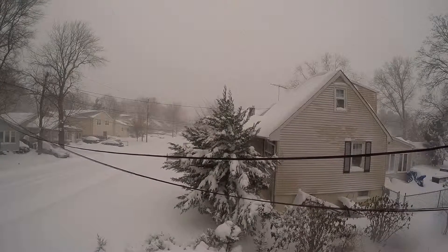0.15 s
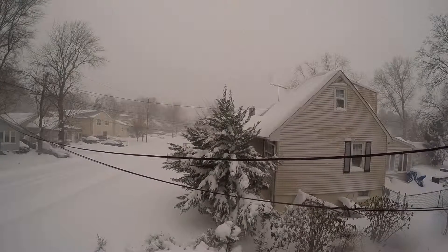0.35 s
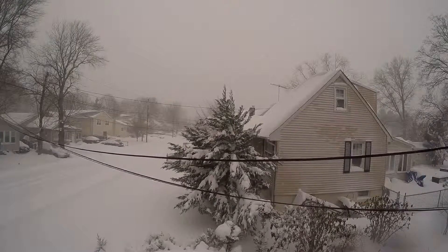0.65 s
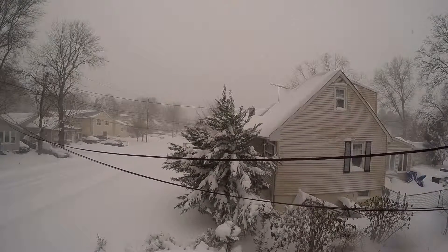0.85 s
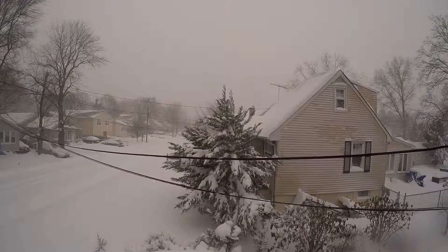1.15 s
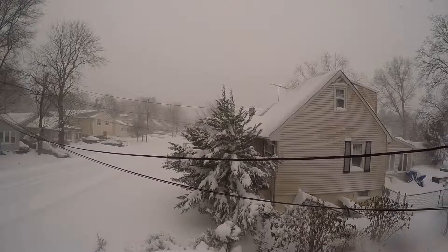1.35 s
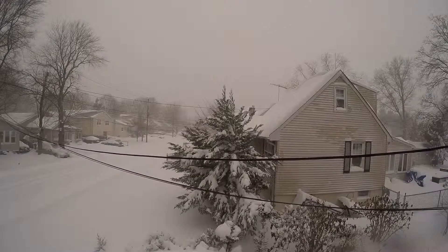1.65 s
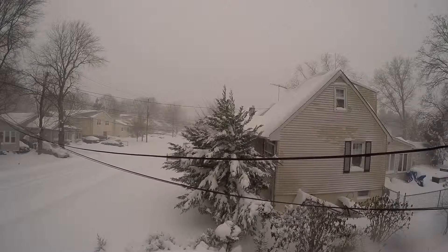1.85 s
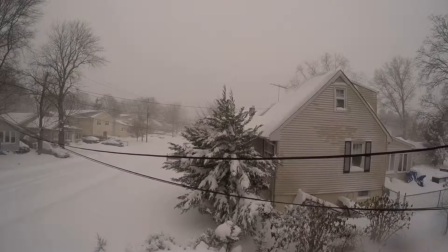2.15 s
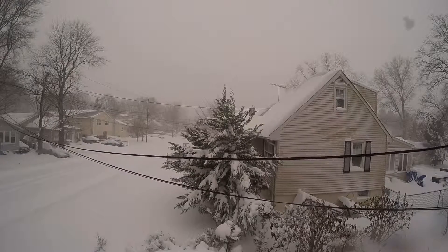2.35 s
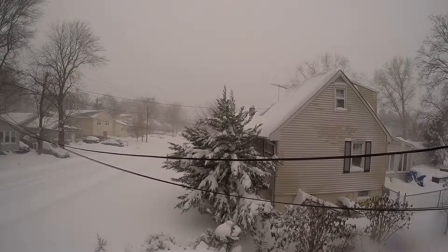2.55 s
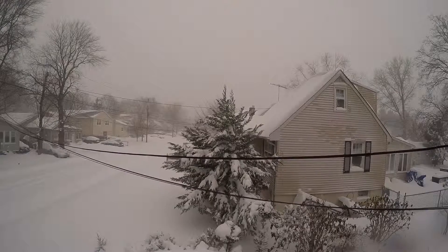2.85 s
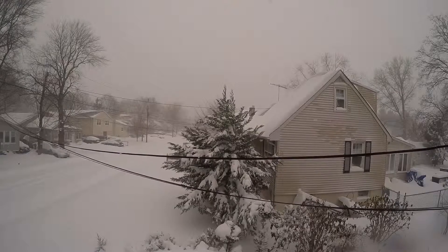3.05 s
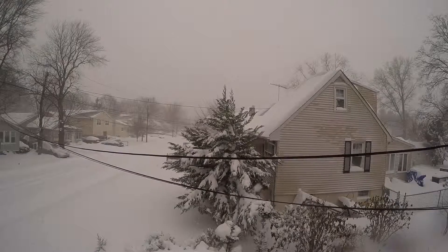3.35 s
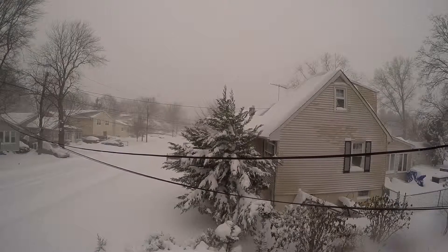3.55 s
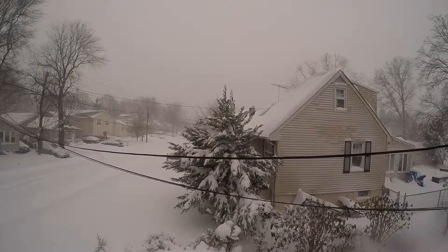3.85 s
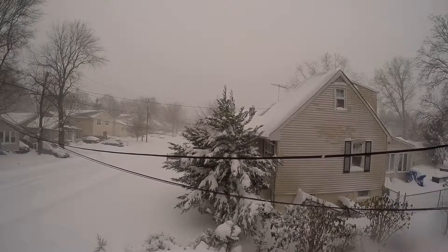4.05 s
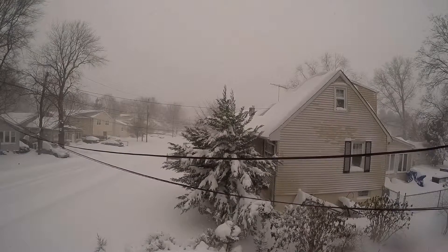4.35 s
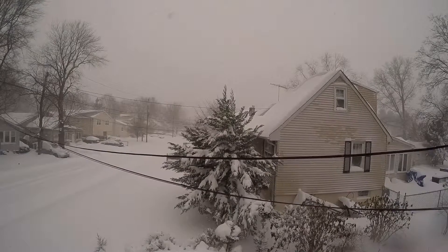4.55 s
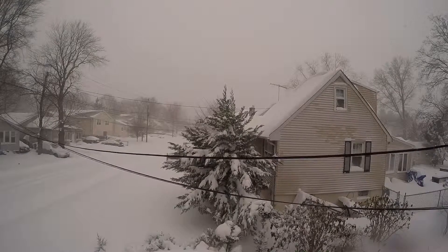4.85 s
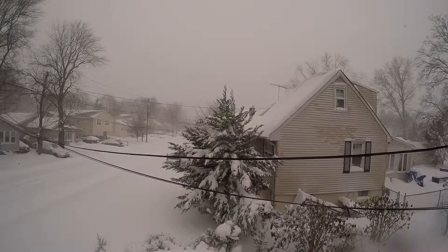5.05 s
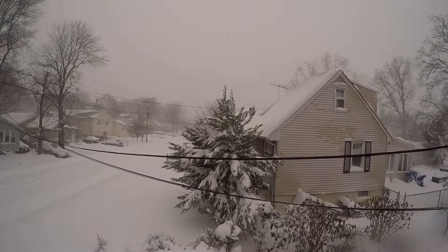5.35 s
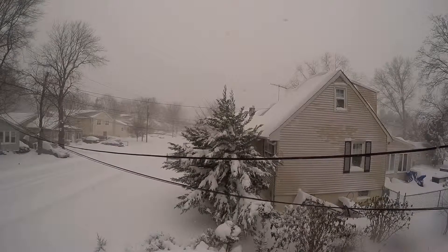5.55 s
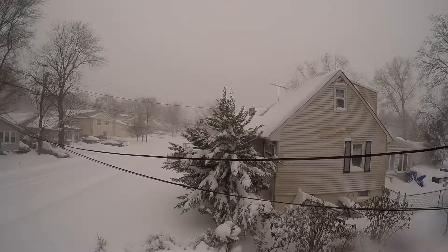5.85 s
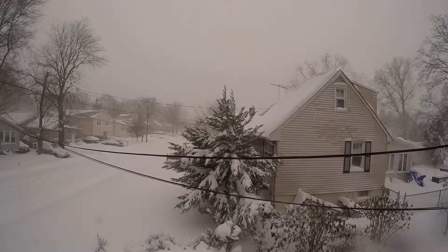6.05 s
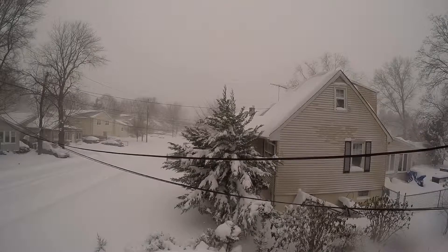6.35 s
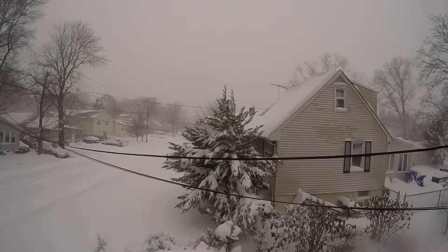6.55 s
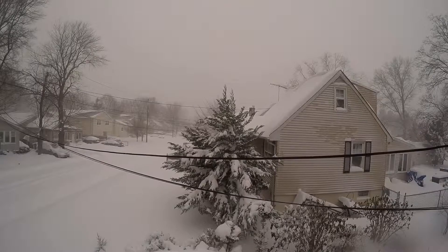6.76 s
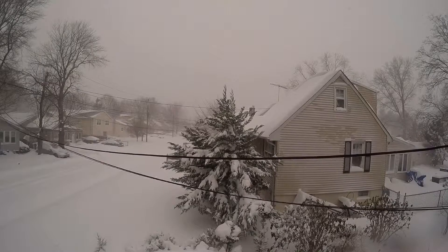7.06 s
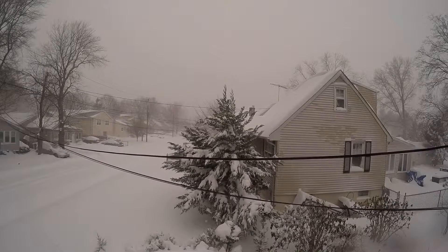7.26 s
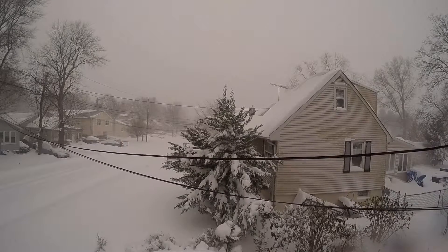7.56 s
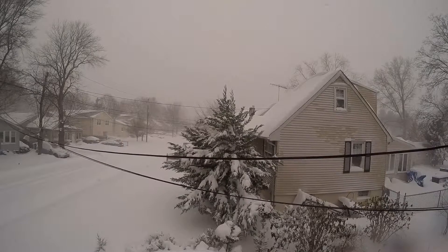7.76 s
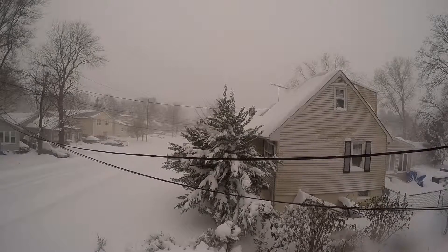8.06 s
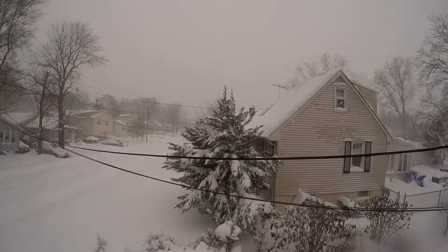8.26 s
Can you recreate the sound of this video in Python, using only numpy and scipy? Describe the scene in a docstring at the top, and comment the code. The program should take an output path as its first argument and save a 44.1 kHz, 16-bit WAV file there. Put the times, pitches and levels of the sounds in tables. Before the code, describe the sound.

Gusting snowstorm wind rumbles low against a microphone housing while driven snow crackles densely and ice pellets tick sharply over a faint distant hiss.

```python
"""Outdoors in a snowstorm: a microphone in a housing stands in the wind and the driven snow.
Far off the storm hisses, with a thin whine; at the port, eddies make low noise that swells with the wind.
Soft clumps tap as decaying sines. Fine grains excite the shell's resonances as a dense crackle over a
dull powder hiss. Bigger pellets tick sharply: short noise bursts sound the shell and crack above it."""
import sys
import numpy as np
from scipy import signal
from scipy.fft import rfft, irfft
from scipy.io import wavfile
from scipy.ndimage import uniform_filter1d

SR = 44100
rng = np.random.default_rng(int(sys.argv[2]) if len(sys.argv) > 2 else 0)


def to_wav(s):
    """Save 16-bit WAV."""
    ch = np.atleast_2d(s).T  # columns
    pcm = np.round(np.clip(ch, -1, 1) * 32767)  # PCM
    wavfile.write(sys.argv[1], SR, pcm.astype(np.int16))


N = 371322

# resonances of the housing: centre_hz, width_hz, gain_db
RESONANCES = [(770, 210, -11.5), (1045, 50, -10), (1316, 90, -6), (1802, 460, 0.5), (2147, 126, -2.5),
              (2353, 50, 2.5), (2713, 260, 6.5), (2970, 1900, -0.5), (4370, 840, 3.5), (6940, 2100, -4),
              (9480, 630, -2), (14400, 15000, -5.5)]
SNOW_DB = -50.5  # nominal level of fine snow in the usual wind, between flurries
CUTOFF_HZ = 15500  # upper limit of the microphone's band


def from_db(db):
    """Logarithmic level: an amplitude ratio is 10 to the power of dB / 20."""
    return 10 ** (np.asarray(db) / 20)


def rms_one(x):
    """Normalisation of power: each row is scaled to unit rms."""
    return x / np.sqrt(np.mean(x ** 2, axis=-1, keepdims=True) + 1e-20)


def butter(x, hz, kind, order=2):
    """Causal Butterworth filtering: the passband is maximally flat."""
    sections = signal.butter(order, hz, kind, fs=SR, output="sos")
    return signal.sosfilt(sections, x + 1e-18)


def noise(spectrum):
    """Spectral shaping: white noise is weighted by a relative spectrum, then set to rms 1."""
    hz, db = np.transpose(spectrum)
    bins = np.maximum(np.arange(N // 2 + 1) * SR / N, 1)
    gain = from_db(np.interp(np.log(bins), np.log(hz), db))
    # beyond the first and last points the amplitude falls 6 dB per octave
    gain = gain * np.minimum(bins / hz[0], 1) * np.minimum(hz[-1] / bins, 1)
    return rms_one(irfft(rfft(rng.standard_normal(N)) * gain, N))


def drift(per_s):
    """Random modulation: lines join independent normal values, per_s of them a second; rms 1."""
    at = np.arange(N) * per_s / SR
    return rms_one(np.interp(at, np.arange(N // 10), rng.standard_normal(N // 10)))


def evened(x, span_s):
    """Envelope normalisation: the short-time rms is held near 1, faster detail survives."""
    size = max(int(span_s * SR), 2)
    power = uniform_filter1d(uniform_filter1d(x ** 2, size), size)
    return x / np.sqrt(power + 1e-14)


def swell(s, length_s):
    """Gaussian envelope: 1 at its middle s, about a third half a length away."""
    return np.exp(-(2 * (np.arange(N) / SR - s) / length_s) ** 2)


def resonance(x, hz, width):
    """Damped oscillator: a two-pole resonance with gain 1 at its peak, its width set by the damping."""
    r = np.exp(-np.pi * width / SR)
    zeros = np.array([1, 0, -1]) * (1 - r * r) / 2
    poles = [1, -2 * r * np.cos(2 * np.pi * hz / SR), r * r]
    return signal.lfilter(zeros, poles, x + 1e-18)


def spots(count):
    """Modal coupling: each struck spot has a gain per resonance, with equal mean power over the spots."""
    gains = from_db(4.5 * rng.standard_normal((count, len(RESONANCES))))
    return gains / np.sqrt(np.mean(gains ** 2, axis=0))


def housing(force, spot):
    """Modal superposition: the force drives every shell resonance, weighted by the spot struck."""
    rings = 0
    for (hz, width, db), share in zip(RESONANCES, spot):
        rings = rings + from_db(db) * share * resonance(force, hz, width)
    return butter(rings, 530, "high")


def wind_level():
    """Interpolation between gust levels: wind strength in dB over its usual value."""
    # wind at the microphone: time_s, level_db (over the usual strength)
    gust_points = [(0, 0), (.3, 2.5), (.48, -1.5), (1.0, -2), (1.41, -.5), (1.5, -6), (2.05, -2.5),
                   (2.75, -2.5), (3.2, -6.5), (4.1, -5.5), (4.27, 2.5), (4.7, 0), (5.83, 2), (5.97, -3.5),
                   (6.55, -2.5), (7.38, 1), (7.63, -3), (7.85, 3), (8.07, 1.5), (8.42, 7.5)]
    s, db = np.transpose(gust_points)
    return np.interp(np.arange(N) / SR, s, db)


def far_storm():
    """Broadband turbulence noise: wind hisses in distant trees under a narrow-band whine."""
    # spectrum of the far hiss: frequency_hz, relative_db (per Hz)
    hiss_spectrum = [(100, 8), (250, 4), (350, 0.5), (520, -2.5), (660, -2.5), (900, -6), (1700, -3.5),
                     (2700, -7), (3600, -9), (4600, -11), (6000, -11), (10000, -21), (15000, -18.5)]
    hiss_db, whine_db = -54.5, -67.5  # mean hiss level, rms of the whine
    hiss = from_db(hiss_db + 0.6 * drift(1.65)) * noise(hiss_spectrum)
    whine = resonance(rng.standard_normal(N), 8540, 230)
    whine = rms_one(resonance(whine, 8540, 230))
    return hiss + from_db(whine_db) * whine


def buffeting():
    """Turbulent pressure at the port: big eddies heave, middling ones rumble, small ones flutter."""
    # spectra of the slow, middling and quick eddies, each: frequency_hz, relative_db (per Hz)
    heave_spectrum = [(10, -17.5), (20, -6.5), (33, -6), (42, -12), (55, -36), (120, -46)]
    rumble_spectrum = [(30, -40), (44, -5.5), (56, 0.5), (68, -5.5), (84, -12.5), (100, -19), (200, -52)]
    flutter_spectrum = [(60, -43), (88, -3), (97, -2), (110, 6.5), (122, -5), (140, -14), (165, -17),
                        (250, -22.5), (500, -31), (1200, -28.5)]
    # single eddies that hit the port: middle_s, length_s, swell_db, pitch_hz
    eddy_rows = [(0.145, .2, 6.5, 28), (.3, 0.12, 10, 63.6), (0.503, 0.13, 10, 111), (0.835, 0.13, 9, 58),
                 (1.23, 0.11, 10, 62), (1.643, 0.11, 9.5, 42), (2.09, 0.061, 10, 34),
                 (2.38, 0.096, 13.5, 59.7), (2.496, 0.084, 11.5, 95), (2.777, 0.14, 14, 65),
                 (3.427, .12, 9, 58), (3.55, 0.19, 12.5, 100), (3.668, 0.3, 7.5, 28),
                 (3.837, 0.15, 11, 100), (4.288, 0.18, 5, 55), (4.807, 0.082, 8, 28),
                 (4.898, 0.088, 6.5, 60), (5.712, 0.087, 18.5, 34), (5.796, 0.32, 6.5, 116),
                 (6.248, 0.2, 7.5, 105), (6.605, 0.14, 8, 90), (6.944, 0.15, 10, 89),
                 (7.143, 0.14, 10.5, 35.3), (7.353, .18, 9, 44.6), (7.413, 0.21, 6.5, 115),
                 (7.85, 0.17, 7, 34), (7.963, 0.15, 10.5, 47.5), (8.38, 0.39, 11.5, 46)]
    reach_octaves = 0.82  # how far from its own pitch an eddy still stirs the air

    wind_db = wind_level()
    octaves = np.log2([30, 60, 110])[:, None]  # pitches of heave, rumble and flutter
    swells_db = 0
    for s, length_s, db, hz in eddy_rows:
        nearness = np.exp(-((octaves - np.log2(hz)) / reach_octaves) ** 2)
        swells_db = swells_db + db * swell(s, length_s) * nearness
    heave_db, rumble_db, flutter_db = swells_db

    # level in the usual wind, then dB per dB of wind
    heave_gain = from_db(-44.5 + 1.1 * wind_db + heave_db)
    rumble_gain = from_db(-46 + 1.13 * wind_db + rumble_db)
    flutter_gain = from_db(-52.5 + 1.58 * wind_db + flutter_db)
    heave = heave_gain * evened(noise(heave_spectrum), span_s=0.19)
    rumble = rumble_gain * evened(noise(rumble_spectrum), span_s=0.065)
    flutter = flutter_gain * evened(noise(flutter_spectrum), span_s=0.24)
    return heave + rumble + flutter


def clumps(size=3000):
    """Damped free vibration: a soft lump gives a dull tap and stirs a low resonance of the mount."""
    # soft clumps of snow: start_s, level_db (near the peak), pitch_hz
    clump_rows = [(0.819, -36, 730), (1.346, -37, 1030), (2.735, -39, 1070), (2.815, -38, 815),
                  (4.316, -26.5, 1120), (4.887, -34.5, 1010), (5.1, -41, 1030), (5.444, -30, 1370),
                  (6.541, -33.5, 1310), (6.833, -39.5, 756), (7.05, -30, 1230), (7.104, -27.5, 1290),
                  (7.406, -36.5, 850), (7.852, -22.5, 1280), (8.147, -34.5, 1020)]
    out, t = np.zeros(N + size), np.arange(size) / SR
    mount = 0.29 * np.sin(2 * np.pi * 730 * t) * np.exp(-t / 0.0026)
    attack = 1 - np.exp(-t / 0.00055)
    for s, level_db, hz in clump_rows:
        tap = np.sin(2 * np.pi * hz * t) * np.exp(-t / 0.0019)
        at = int(s * SR)
        # 4 dB make up for what the soft attack takes away
        out[at:at + size] += from_db(level_db + 4.0) * (tap + mount) * attack
    return out[:N]


def snowfall():
    """Transport by wind: the snow level in dB follows the wind and thickens in each flurry."""
    # flurries that sweep over the housing: middle_s, length_s, swell_db
    flurry_rows = [(.15, .22, 6.5), (0.387, .07, 4), (0.645, .16, 7.5), (1.304, .22, 9), (1.945, 0.11, 6.5),
                   (2.142, .1, 8.5), (2.399, .16, 2), (2.624, .2, 7), (2.8, .08, 5), (3.032, .14, 6),
                   (3.339, .07, 7.5), (3.665, .26, 6), (4.308, .16, 7.5), (4.519, .14, 7), (4.751, .1, 5),
                   (5.036, .2, 7), (5.31, .11, 5), (5.47, .2, 2), (5.815, .14, 7.5), (6.192, .24, 9),
                   (6.538, .06, 5), (6.72, .09, 13), (7.109, .08, 6), (7.318, .1, 4.5), (7.761, .12, 7),
                   (7.92, .14, 5), (8.223, .16, 8)]
    flurries_db = sum(db * swell(s, length_s) for s, length_s, db in flurry_rows)
    return SNOW_DB + 1.2 * wind_level() + flurries_db  # 1.2 dB per dB of wind


def fine_snow(level_db, count=6):
    """Shot noise: chance impacts of uneven grains ring several spots, more often in a thick flurry."""
    bunch_s = .08  # bunches shorter than this keep their unevenness
    per_s = 1300 * from_db(.8 * (level_db + 45.5) + 3.0 * drift(120))
    born = np.flatnonzero(rng.random(N) < per_s / SR)
    sizes = from_db(6.2 * np.minimum(rng.exponential(1, N)[born], 4.2))
    where = rng.integers(0, count, N)[born]
    grit = rng.standard_normal(N)
    octaves = np.log2(np.array(RESONANCES)[:, 0] / 4500)
    crackle = 0
    for k, (spot, hardness) in enumerate(zip(spots(count), np.linspace(-1, 1, count))):
        grains = np.bincount(born, sizes * (where == k), N)
        # each grain crumbles with a time constant of 0.35 ms
        crumble = signal.lfilter([1], [1, -np.exp(-1 / (.00035 * SR))], grains + 1e-18)
        tilt = from_db(1.7 * hardness * octaves)  # hard grains sound brighter
        crackle = crackle + housing(crumble * grit, spot * tilt)
    # powder too fine to tick brushes the shell as a soft, dull hiss
    brush = housing(grit, np.ones(len(RESONANCES)))
    powder = rms_one(butter(brush, 1550, "low", order=1))
    mix = from_db(1.1) * evened(crackle, span_s=bunch_s) + from_db(-12.5) * powder
    return from_db(level_db) * mix


def small_pellets(snow_db, count=80):
    """Stratified chance arrivals: small pellets crowd, and strike harder, where the snow is thick."""
    share = np.cumsum(from_db(1.1 * snow_db))
    order = (np.arange(count) + rng.random(count)) / count
    at = np.searchsorted(share / share[-1], order)
    strength, pitch, shatter = rng.standard_normal((count, 3)).T
    # -41.5 dB in the usual snowfall, 0.46 dB per dB of snow, spread 2.9 dB
    level_db = -41.5 + 0.46 * (snow_db[at] - SNOW_DB) + 2.9 * strength
    pitch_hz = 5000 * 2 ** (.6 * pitch)
    shatter_s = 0.00039 * 2 ** (.5 * shatter)
    return np.column_stack([at / SR, level_db, pitch_hz, shatter_s])


def pellets(small_rows, size=1100):
    """Impact excitation: a shattering pellet sounds the shell's body and ring, its splinters crack."""
    # big ice pellets: start_s, level_db (nominal, over one tick), pitch_hz, shatter_s
    big_rows = [(.0328, -27, 3000, 0.0017), (.6378, -36.5, 6600, 0.00027), (.6553, -31.5, 3720, 0.00027),
                (.771, -24, 4000, 0.003), (.8196, -30, 6700, 0.00016), (.922, -36.5, 2220, 0.00079),
                (.943, -37, 4260, 0.00046), (1.1538, -32, 6140, 0.00023), (1.3174, -34.5, 2900, .0003),
                (1.3583, -31, 3400, 0.00028), (1.412, -34, 4380, 0.0058), (1.425, -36, 5100, 0.00074),
                (1.6325, -32.5, 1800, 0.00086), (2.1609, -22.5, 2260, 0.0047), (2.218, -34, 4000, 0.00044),
                (2.2794, -37.5, 9000, .0002), (2.4367, -32, 6350, .0002), (2.555, -35.5, 2680, 0.0088),
                (2.7372, -36, 6000, 0.0061), (2.8594, -39.5, 1500, .0035), (3.0198, -40, 4350, 0.0037),
                (3.2616, -44, 6140, 0.0016), (3.35, -40.5, 4300, 0.0023), (3.5498, -42, 5900, .0002),
                (3.5944, -35, 6000, .0002), (3.6556, -34.5, 2900, 0.0023), (3.665, -29.5, 1900, 0.00027),
                (3.751, -39.5, 3070, .0002), (3.8617, -40, 7900, .0002), (4.1928, -32.5, 7000, 0.00066),
                (4.3166, -32.5, 4840, 0.0004), (4.3667, -36, 1800, 0.0022), (4.438, -31, 2500, 0.0013),
                (4.5283, -23, 3200, 0.00022), (4.5573, -32.5, 6000, .0002), (4.6649, -33.5, 4160, 0.00027),
                (4.7276, -30, 2040, 0.0053), (4.8862, -39.5, 4600, 0.0038), (4.9373, -35, 4600, 0.00081),
                (5.028, -24.5, 2500, 0.00024), (5.1021, -32, 4100, .0002), (5.321, -31, 4000, 0.0046),
                (5.4245, -22.5, 2740, 0.00096), (5.4445, -35, 6000, 0.00051), (5.5313, -38, 5470, 0.0018),
                (5.597, -29, 3700, 0.0011), (5.8714, -34.5, 5500, .003), (6.1992, -37.5, 4100, .0006),
                (6.2426, -37, 1700, 0.0071), (6.296, -33.5, 5200, 0.0025), (6.6091, -38, 4550, 0.00037),
                (6.7329, -28.5, 5000, .0002), (6.775, -30.5, 2200, .0012), (6.8498, -24.5, 4000, 0.0027),
                (7.087, -28, 2630, 0.00024), (7.0973, -28.5, 6000, 0.003), (7.1058, -28.5, 1600, 0.0045),
                (7.2191, -41, 7000, 0.00027), (7.5781, -26.5, 3240, 0.0006), (7.7585, -32, 3650, 0.0051),
                (7.9276, -33, 6500, 0.00075), (7.9901, -25.5, 4600, 0.00066), (8.024, -33, 6000, 0.00066),
                (8.1056, -33, 3970, 0.0038), (8.2217, -23.5, 5200, 0.0036), (8.2476, -30, 4670, .0027),
                (8.2658, -31, 2850, 0.0007)]
    body_hz, ring_hz, crack_from_hz = (1000, 2200), (2200, 3700), 6000
    below_db, above_db = 6, 8  # fall per octave below and above a pellet's pitch
    tick_s = .005  # span over which the level of a tick counts

    rows = np.vstack([big_rows, small_rows])
    s, level_db, pitch_hz, shatter_s = np.transpose(rows)[:, :, None]
    centres_hz = (np.mean(body_hz), np.mean(ring_hz), crack_from_hz)
    octaves = np.log2([hz / pitch_hz for hz in centres_hz])
    body_db, ring_db, crack_db = level_db - np.maximum(-below_db * octaves, above_db * octaves)
    scatter_octaves = 0.033 + .25 * rng.standard_normal(s.shape)
    crack_hz = np.maximum(pitch_hz, crack_from_hz) * 2 ** scatter_octaves

    # a burst of splinters with a weak tail and a soft onset
    t = np.arange(size) / SR
    splinters = np.exp(-(t / np.maximum(shatter_s, .0003)) ** 2) + .13 * np.exp(-t / .002)
    onset = 1 - np.exp(-t / 0.00069)
    force = splinters * onset * rng.standard_normal((len(s), size))

    shell = housing(force, spots(len(s)).T[:, :, None])
    crack = np.array([resonance(f, min(hz, CUTOFF_HZ), 1.02 * hz)
                      for f, hz in zip(force, crack_hz[:, 0])])
    crack = crack + 0.22 * butter(force, 10200, "high")  # the finest splinters add a glassy top
    # the shell passes little between two of its resonances
    crack = crack - 0.42 * resonance(crack, 6460, 2600)

    body = rms_one(butter(shell, body_hz, "band", order=3))
    ring = rms_one(butter(shell, ring_hz, "band", order=3))
    crack = rms_one(butter(crack, ring_hz[1], "high", order=3))
    ticks = from_db(body_db - 2.05) * body
    ticks = ticks + from_db(ring_db + 1.13) * ring
    ticks = ticks + from_db(crack_db + 0.6) * crack

    out = np.zeros(N + size)
    for at, tick in zip((s[:, 0] * SR).astype(int), ticks):
        out[at:at + size] += tick * np.sqrt(tick_s * SR / size)
    return out[:N]


def scene():
    """Linear superposition: wind and snow at the microphone add to the distant storm."""
    snow_db = snowfall()
    ice = pellets(small_pellets(snow_db))
    return (far_storm() + buffeting() + clumps() + fine_snow(snow_db) + ice)[None]


def record(dry):
    """Band limitation: a steep elliptic low-pass cuts the top."""
    sections = signal.ellip(10, .2, 70, CUTOFF_HZ, fs=SR, output="sos")
    return signal.sosfilt(sections, dry)


dry = scene()
out = record(dry)
to_wav(out)
```